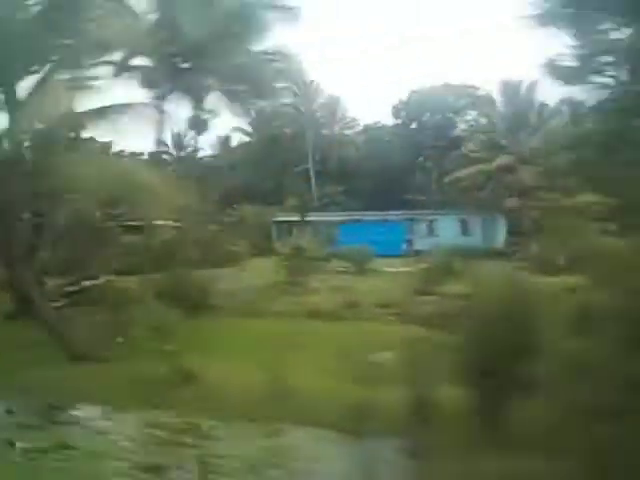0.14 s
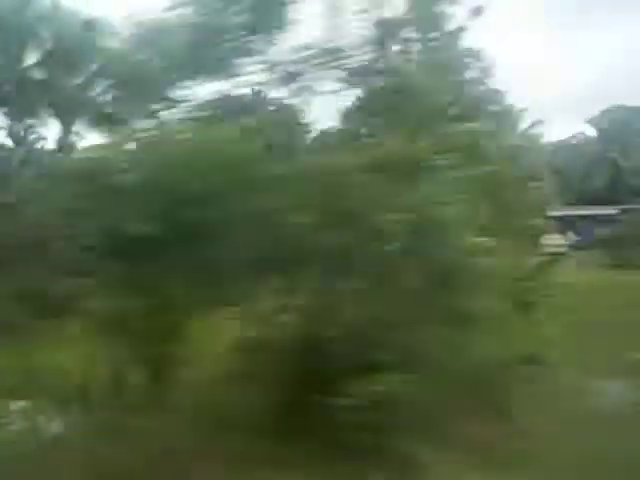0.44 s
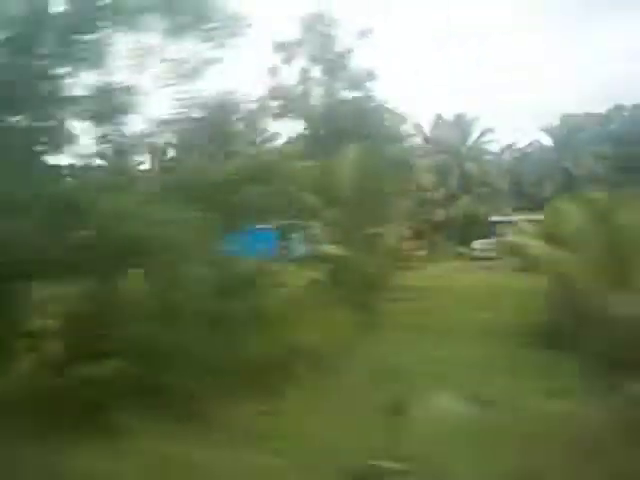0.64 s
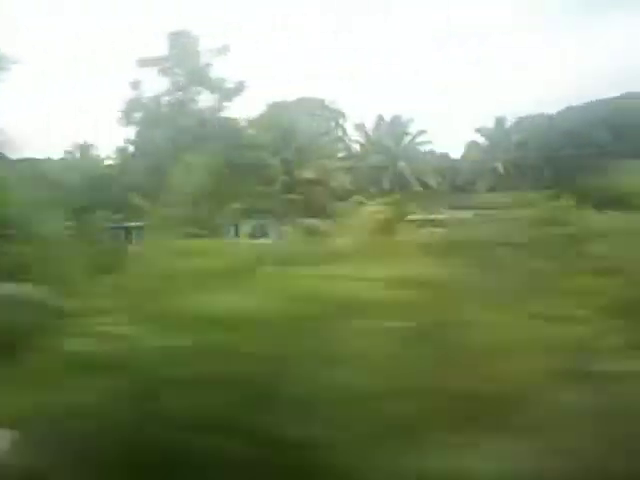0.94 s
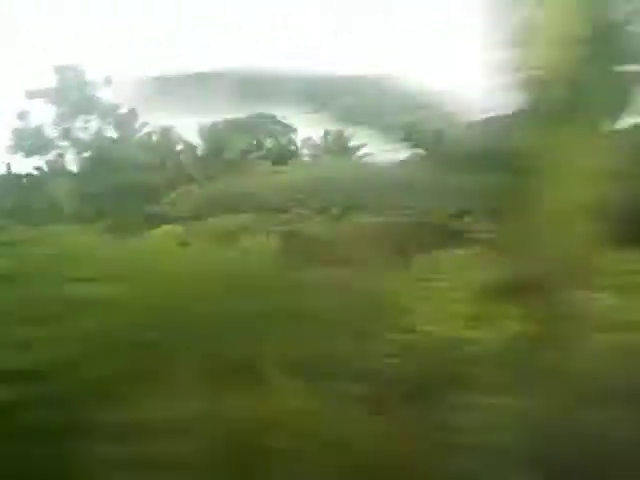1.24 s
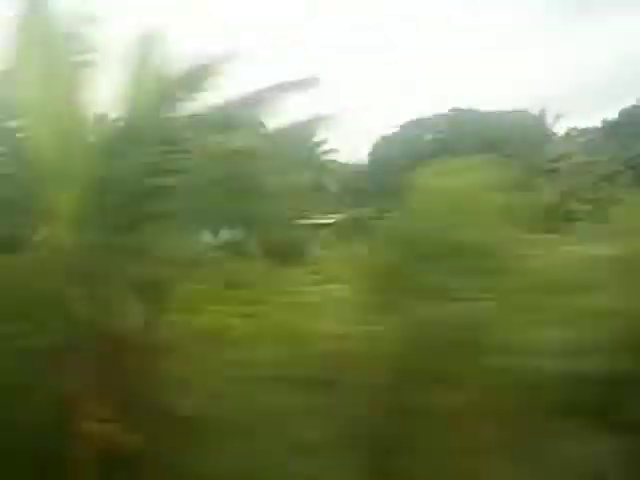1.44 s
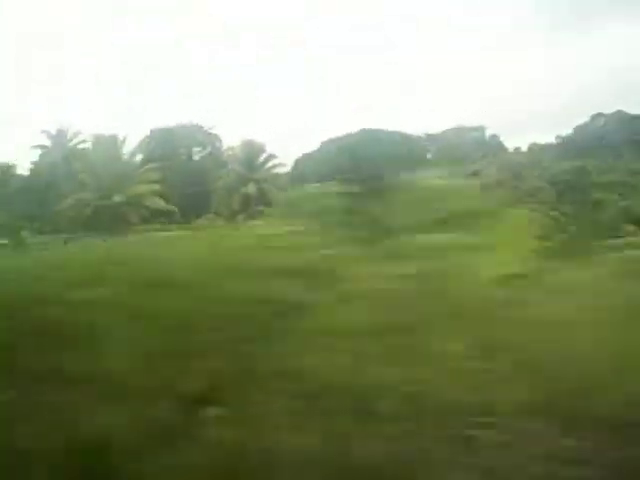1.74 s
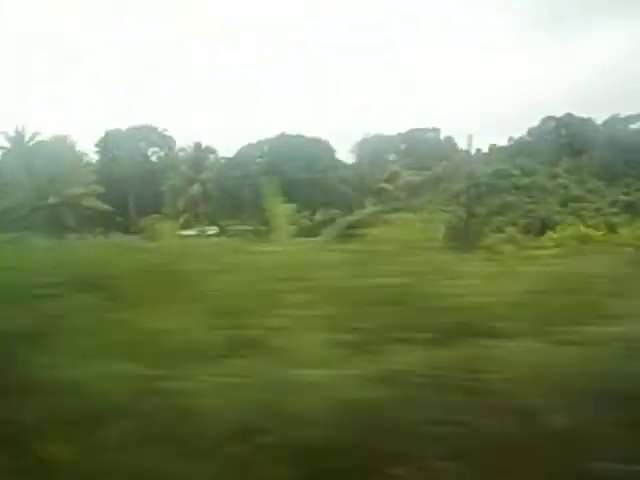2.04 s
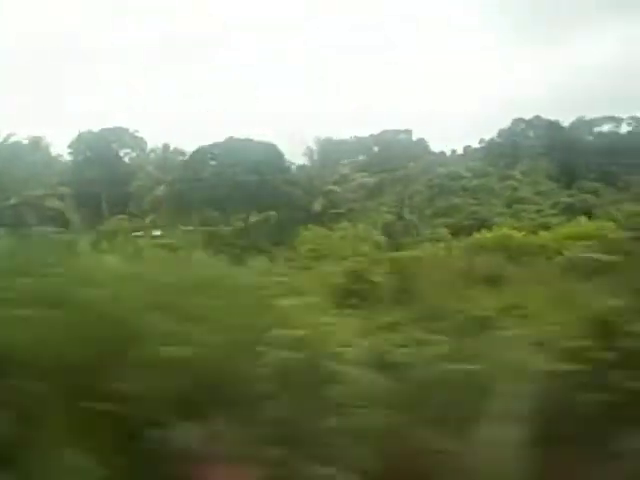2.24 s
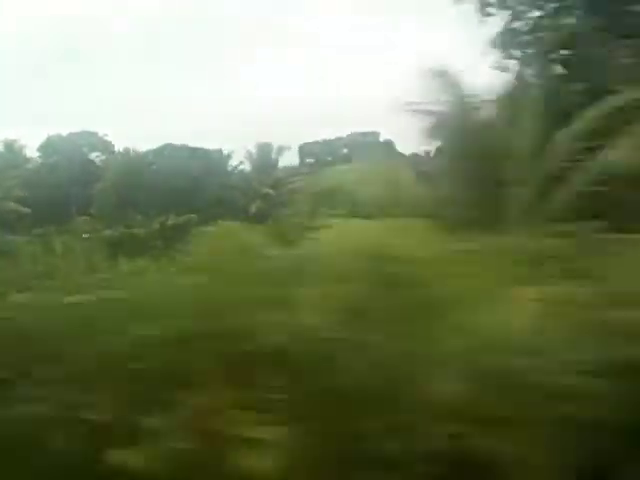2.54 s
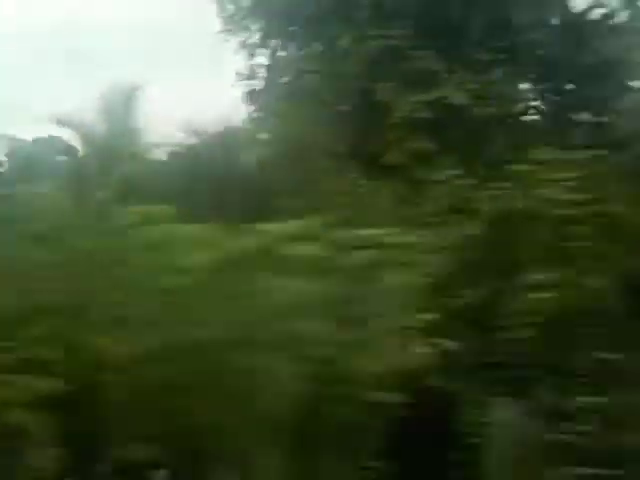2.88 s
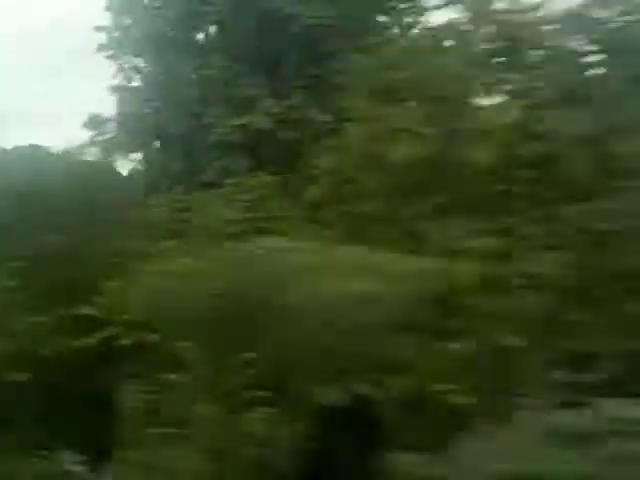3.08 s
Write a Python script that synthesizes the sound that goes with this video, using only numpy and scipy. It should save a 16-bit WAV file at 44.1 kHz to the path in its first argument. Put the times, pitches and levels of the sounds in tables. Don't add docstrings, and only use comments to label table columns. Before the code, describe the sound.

Steady low road roar inside a moving bus, bumps thudding, loose panels rattling, trim squeaking

```python
import sys
import numpy as np
from scipy import signal
from scipy.fft import rfft, irfft
from scipy.io import wavfile
from scipy.ndimage import uniform_filter1d

SR = 44100
rng = np.random.default_rng(int(sys.argv[2]) if len(sys.argv) > 2 else 0)


def invert_db(x):
    u = np.asarray(x, float) / 20
    return 10 ** u


def log_audio(samples):
    frames = np.atleast_2d(samples).T
    limited = np.clip(frames, -1, 1)
    pcm = np.round(limited * 32767).astype(np.int16)
    wavfile.write(sys.argv[1], SR, pcm)


N = 141561


def level(x, db):
    return x * invert_db(db) / np.sqrt(np.mean(x ** 2))


def colour(x, points):
    p = np.array(points)
    f = np.arange(N // 2 + 1) * SR / N + 1
    outside = np.abs(np.log(f / np.clip(f, p[0, 0], p[-1, 0])))
    db = np.interp(np.log(f), np.log(p[:, 0]), p[:, 1]) - 30 * outside
    return irfft(rfft(x) * invert_db(db), N)


def resonance(x, hz, width):
    return signal.lfilter(*signal.iirpeak(hz, hz / width, SR), x)


def walk(rate):
    k = int(SR / rate)
    steps = np.repeat(rng.standard_normal(N // k + 1), k)
    return 1.326 * uniform_filter1d(uniform_filter1d(steps, k), k)[:N]


def patchy(points, flicker_db, rate):
    spectrum = rfft(colour(rng.standard_normal(N), points))
    f = np.arange(N // 2 + 1) * SR / N + 1
    out = 0
    for k in np.arange(12, 44):
        share = np.clip(1 - np.abs(3 * np.log2(f) - k), 0, 1)
        out = out + irfft(spectrum * share, N) * invert_db(flicker_db * walk(rate))
    return out


def strike(t, start, db, rise_s, fall_s):
    u = np.maximum(t - start, 0)
    return invert_db(db) * np.minimum(u / rise_s, 1) * np.exp(-u / fall_s)


def engine(t):
    shaft_hz, cylinders, gear_teeth = 23.51, 6, 80
    turn = 2 * np.pi * np.cumsum(shaft_hz * (1 + 0.0012 * walk(5.81))) / SR
    drone = invert_db(-45 + 2 * walk(15)) * np.sin(cylinders * turn)
    drone += invert_db(-71 + 2 * walk(3.8)) * np.sin(3.5 * turn)
    whine = np.sin(gear_teeth * turn)
    whine += invert_db(-4.5 + 2 * walk(7.1)) * np.sin((gear_teeth + 1) * turn)
    return np.sqrt(2) * (drone + invert_db(-40 + 2 * walk(22.55)) * whine)


# t/s, peak level/dB
TICKS = [
    (1.3747, -40),
    (1.4455, -49),
    (1.4655, -44),
    (1.7583, -51),
    (2.0871, -56),
    (2.7356, -44),
    (2.8094, -50),
    (2.9406, -51),
    (3.1566, -51),
]


def ticks(t):
    envelope = sum(strike(t, s, db - 6, 0.001, 0.006) for s, db in TICKS)
    treble = signal.butter(4, 8500, "high", fs=SR, output="sos")
    return envelope * signal.sosfilt(treble, rng.standard_normal((2, N)))


# t/s, peak level/dB, share of the full glide
SQUEAKS = [(0.701, -44.5, 0.71), (0.7646, -40, 0.84), (0.824, -39.5, 0.6), (1.001, -42, 0.34),
           (1.3246, -39, 0.3), (1.676, -49, 1.4), (2.059, -47, 0.68), (2.164, -37.5, 0.58),
           (2.2742, -45, 0.68), (2.4468, -47, 0.8), (2.4972, -39.5, 0.57), (2.814, -49.5, 0.35),
           (3.114, -47, 0.56)]


def squeaks(t):
    from_hz, to_hz, length_s, rough = 6600, 5350, 0.008, 0.04
    out = np.zeros(N)
    u = np.arange(int(length_s * 2 * SR)) / SR / length_s
    shape = np.minimum(u / 0.1, 1) * np.exp(-1.2 * u ** 2)
    for s, db, glide in SQUEAKS:
        hz = to_hz + (from_hz - to_hz) * np.clip(glide, 0.3, 1.1) * np.exp(-1.8 * u)
        hz *= 1 + rough * uniform_filter1d(rng.standard_normal(len(u)), size=12)
        i = int(s * SR)
        out[i:i + len(u)] += invert_db(db + 1) * shape * np.sin(2 * np.pi * np.cumsum(hz) / SR)
    return out


# t/s, peak level/dB, length/s, f/Hz
RATTLES = [(0.012, -28, 0.0059, 4050), (0.166, -45, 0.0046, 2670), (0.499, -39, 0.0056, 3600),
           (0.54, -37, 0.0059, 2920), (0.904, -32, 0.0056, 4100), (0.953, -32.5, 0.006, 3860),
           (1.033, -39, 0.005, 4510), (1.115, -28, 0.0056, 4580), (1.202, -29, 0.0078, 4400),
           (1.3363, -25, 0.0069, 4300), (1.376, -33, 0.0069, 4040), (1.425, -22.5, 0.0031, 3650),
           (1.448, -29.5, 0.0078, 4100), (1.4658, -19, 0.0045, 5000), (1.744, -31, 0.0052, 2800),
           (1.749, -28.5, 0.0067, 4100), (1.756, -29, 0.006, 3260), (1.761, -26, 0.0085, 4100),
           (1.765, -30, 0.006, 2900), (1.774, -34.5, 0.0045, 4350), (1.825, -31, 0.0077, 4320),
           (1.833, -33, 0.007, 4180), (2.182, -36.5, 0.0076, 4000), (2.624, -33, 0.007, 4180),
           (2.7344, -56, 0.0046, 2780), (3.087, -26, 0.0033, 3000), (3.094, -38, 0.0044, 4170)]
# f/Hz, level/dB
RATTLE_TONE = [(1500, -17), (2800, 7), (4400, 0.5), (5500, 0), (6500, -14), (9000, -24), (15500, -20)]


def rattles(t):
    chatter_per_s, chatter_db, chatter_spread_db = 88, -63, 2
    noise = rng.standard_normal(N)
    ring, envelope = 0, 0
    for s, db, length_s, hz in RATTLES:
        burst = strike(t, s, db, 0.00068, length_s)
        envelope = envelope + burst
        ring = ring + burst * level(resonance(noise, hz, 0.13 * hz), -7)
    hits = rng.random(N) < chatter_per_s / SR
    hits = hits * invert_db(chatter_db + chatter_spread_db * rng.exponential(size=N))
    envelope = 0.65 * envelope + signal.lfilter([1], [1, -0.994], hits)
    return ring + 0.61 * envelope * level(colour(rng.standard_normal(N), RATTLE_TONE), 0)


# t/s, peak level/dB, f/Hz
KNOCKS = [
    (.11, -24, 1255),
    (.3, -26, 1320),
    (.478, -16, 1954),
    (.482, -23, 1344),
    (0.734, -18, 1007),
    (1.76, -22, 2100),
    (1.919, -28, 1250),
    (2.68, -25, 2066),
    (2.76, -19, 1570),
]


def knocks(t):
    t60_s = 0.18
    out = 0
    wobble = np.cumsum(walk(90)) / SR
    for s, db, hz in KNOCKS:
        u = np.maximum(t - s, 0)
        tone = np.sin(2 * np.pi * hz * (u + 0.015 * wobble))
        out = out + strike(t, s, db - 6, 0.0066, t60_s / np.log(1000)) * tone
    return out


# f/Hz, level/dB per Hz
SCRAPE_TONE = [(1200, -11), (2000, 9), (2800, 11.5), (3400, -21.5), (4200, -13), (5300, -11), (6200, -8),
               (6900, -19)]
# t/s, level/dB
SCRAPE_BURSTS = [
    (.08, -10.5),
    (.115, -1),
    (.135, 1),
    (.17, 6.5),
    (.21, -0.5),
    (.25, 2.5),
    (.31, 0.5),
    (.39, -6),
    (.46, -6),
]
# f/Hz, width/Hz, level/dB
SCRAPE_RINGS = [(2250, 170, -43), (2900, 100, -51.5), (3790, 100, -56), (4200, 120, -55),
                (5410, 100, -59.5), (6150, 70, -57.5)]
# f/Hz, width/Hz, level/dB
PANEL = [(1320, 78, -12.5), (1514, 98, 2.5), (1604, 71, 3.5)]
# t/s, level/dB
PANEL_STROKES = [
    (.15, -5),
    (.174, 2.5),
    (.205, -3.5),
    (.234, 1.5),
    (.265, -6.5),
    (.308, -4.5),
    (.35, -3.5),
    (.39, -1),
    (.46, 0),
]


def scrape(t):
    start_s, attack_s, end_s, release_s = 0.069, 0.035, 0.385, 0.072
    fall = np.clip((end_s + release_s - t) / release_s, 0, 1)
    rub = level(patchy(SCRAPE_TONE, 5.1, 25.6), -37.5)
    rub = rub + level(resonance(rng.standard_normal(N), 10800, 3000), -60)
    for hz, width, db in SCRAPE_RINGS:
        rub = rub + level(resonance(rng.standard_normal(N), hz, width), db) * invert_db(3.5 * walk(23.8))
    bursts = invert_db(np.interp(t, *np.array(SCRAPE_BURSTS).T))
    swish = np.clip((t - start_s) / attack_s, 0, 1) * bursts * rub

    noise = rng.standard_normal(N)
    ring = level(sum(invert_db(db) * resonance(noise, hz, w) / np.sqrt(w) for hz, w, db in PANEL), -24.5)
    u = np.maximum(t - 0.142, 0)
    strokes = invert_db(np.interp(t, *np.array(PANEL_STROKES).T) - 3.5)
    return fall * (swish + ring * np.minimum(u / 0.0098, 1) * strokes)


# t/s, peak level/dB, f/Hz
BUMPS = [(0.125, -16.5, 606), (0.299, -14.5, 824), (0.489, -17, 557), (0.935, -17, 874), (1.627, -26, 460),
         (1.919, -32, 570), (2.197, -16.5, 600), (2.472, -22.5, 840), (2.559, -18.5, 503), (2.6, -19, 656),
         (2.729, -17.5, 505)]
# t/s, peak level/dB, f/Hz
THUDS = [
    (0.757, -21, 267),
    (0.879, -22, 267),
    (1.039, -20.5, 273),
    (1.626, -13, 316),
    (2.448, -21, 410),
    (2.723, -16, 360),
    (3.12, -19, 390),
]


def bumps(t):
    t60_s = 0.16
    out = 0
    for s, db, hz in list(BUMPS) + list(THUDS):
        puff = level(resonance(rng.standard_normal(N), hz, 0.09 * hz), 0)
        out = out + strike(t, s, db - 7, 0.0079, t60_s / np.log(1000)) * puff
    return out


# f/Hz, level/dB per Hz
ROAR = [(15, -67), (25, -40), (102, -16.5), (133, -11.5), (188, -11.5), (384, -7), (507, 0), (1150, -8.5),
        (1600, -7.5), (2080, -45), (3520, -120)]
# f/Hz, level/dB per Hz
RUSH = [(1300, 0.5), (1600, 2.5), (2000, 14), (2350, 8), (2750, 3.5), (3300, -10), (4250, -4), (5400, -14)]
# f/Hz, width/Hz, level/dB
CABIN = [(84.5, 12, -4.5), (284.5, 36, 0.5), (360, 8.8, -2.5), (528, 35, -2), (624.5, 41, 6.5),
         (742, 12, 2.5), (804, 34, 1.5)]
# t/s, road level/dB, gust level/dB
ROAD = [(0, -30.5, 0), (.15, -27.5, -1.5), (.23, -30, -0.5), (.3, -26.5, 3), (.48, -29, -1), (.7, -29, 0.5),
        (.93, -28, 0.5), (1.0, -30, 1), (1.12, -28.5, 0.5), (1.25, -29, 0), (1.6, -28, 1.5), (1.9, -28, 1),
        (2.06, -30.5, 2), (2.22, -27.5, -1.5), (2.33, -30, 0), (2.58, -27.5, 0.5), (2.97, -30, -0.5),
        (3.21, -27.5, 0)]
# f/Hz, level/dB
APART = [(60, -34), (250, -47.5), (450, -58), (700, -30.5), (1500, -18), (2500, -10), (3200, -10.5),
         (4300, -13.5), (6300, -0.5)]


def road(t):
    roar_db, rush_db, cabin_db = -25, -32.5, -35
    c = np.array(ROAD)
    rush_tone = list(RUSH) + [(6600, -32)]
    gain = invert_db(np.interp(t, c[:, 0], c[:, 1] - np.median(c[:, 1])))
    gust = invert_db(0.67 * walk(8.79) + np.interp(t, c[:, 0], c[:, 2])) / gain
    noise = rng.standard_normal((3, N))
    cabin = sum(invert_db(db) * level(resonance(noise[0], hz, w), 0) * np.sqrt(w) for hz, w, db in CABIN)
    mid = level(patchy(ROAR, 0.53, 7.44), roar_db - 2)
    mid = mid + level(cabin * invert_db(2.9 * walk(11)), cabin_db)
    mid = mid + level(patchy(rush_tone, 0.76, 12.2) * gust, rush_db)
    apart = level(colour(noise[1], ROAR), roar_db) + level(colour(noise[2], rush_tone) * gust, rush_db)
    return gain * np.array([mid, colour(apart, APART)])


# f/Hz, width/Hz, share
PORTS = [(1150, 200, -0.013), (1590, 230, -0.1), (2460, 270, 0.65), (3070, 580, -0.56), (4000, 360, 0.44),
         (6340, 540, -0.55)]


def scene():
    t = np.arange(N) / SR
    roar, apart = road(t)
    swish, chirps, clatter = scrape(t), squeaks(t), rattles(t)
    mid = engine(t) + roar + swish + bumps(t) + knocks(t) + chirps + clatter
    near = 0.85 * colour(np.roll(swish, 400), APART)
    near = near + 0.32 * np.roll(clatter, 30) + 0.1 * np.roll(chirps, 12)
    side = apart + near + sum(share * resonance(mid, hz, w) for hz, w, share in PORTS)
    return np.array([mid + side, mid - side]) + ticks(t)


def top_cut(x):
    return signal.sosfilt(signal.butter(12, 16320, fs=SR, output="sos"), x)


# f/Hz, width/Hz
NOTCHES = [(1766, 101), (2541, 770), (4974, 190)]


def record(dry):
    def cut(x, *design):
        return signal.sosfilt(design[0](*design[1:], fs=SR, output="sos"), x)

    x = dry
    for hz, width in NOTCHES:
        x = signal.lfilter(*signal.iirnotch(hz, hz / width, SR), x)
    low = cut(x, signal.ellip, 8, 0.5, 80, 6750)
    low = cut(low, signal.butter, 6, 6040)

    swell = uniform_filter1d(np.abs(cut(x[0], signal.butter, 2, [4000, 6500], "band")), 300)
    swell = (swell / swell.mean()) ** 0.5
    hiss = level(rng.standard_normal(x.shape), -55.5) * swell
    high = cut(hiss * invert_db([[0.2], [-0.2]]) + 0.32 * x, signal.butter, 12, 9200, "high")
    high = cut(high, signal.ellip, 8, 0.5, 60, 8500, "high")

    gap_hz, gap_width_hz = 7750, 400
    leak = resonance(rng.standard_normal(N), gap_hz, gap_width_hz)
    leak = level(resonance(leak, gap_hz, gap_width_hz), -82)
    leak = np.clip(walk(45) - 0.75, 0, 0.5) * leak
    mix = cut(low + high + leak, signal.ellip, 14, 0.3, 70, 15740)
    return top_cut(mix)


dry = scene()
out = record(dry)
log_audio(out)
```